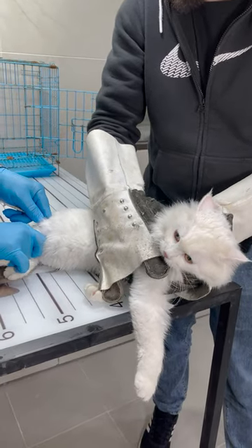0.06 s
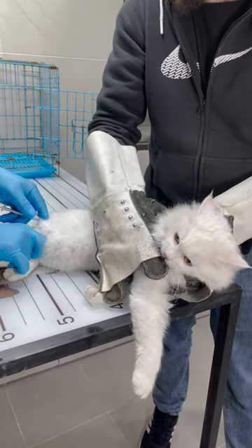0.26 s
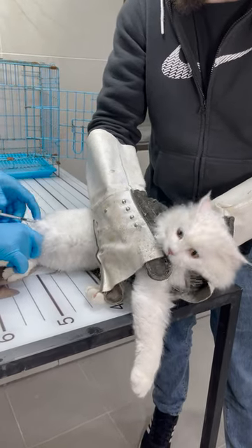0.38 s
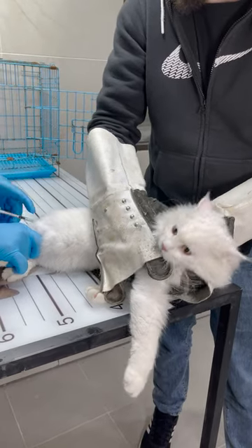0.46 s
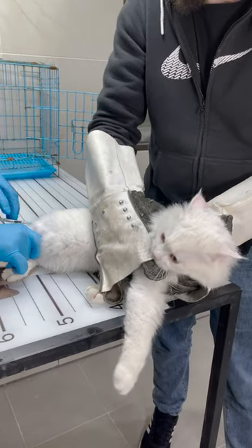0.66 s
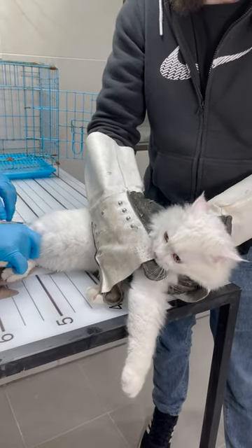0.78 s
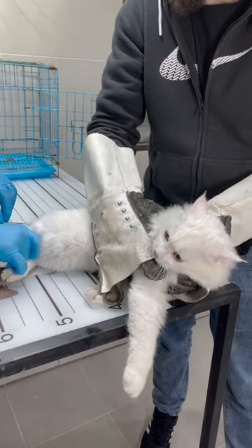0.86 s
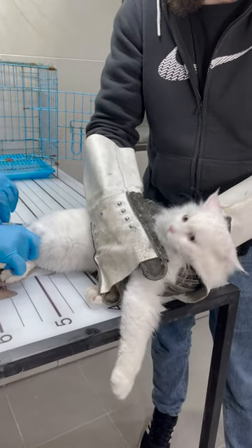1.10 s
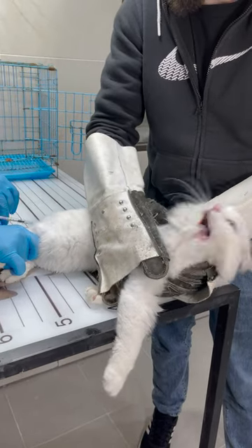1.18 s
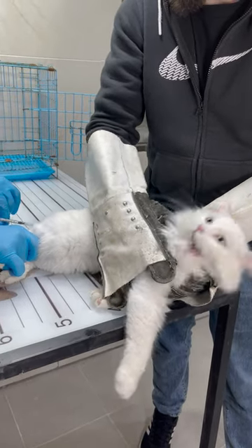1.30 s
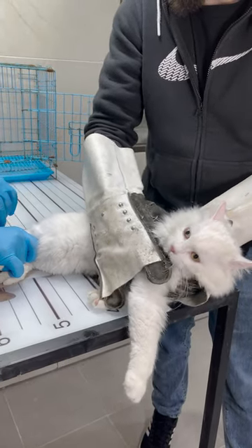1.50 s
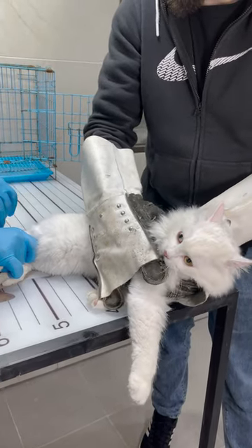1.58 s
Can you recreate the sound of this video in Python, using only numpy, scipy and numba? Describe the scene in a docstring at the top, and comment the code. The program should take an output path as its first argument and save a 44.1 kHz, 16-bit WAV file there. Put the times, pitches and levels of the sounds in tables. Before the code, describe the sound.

A cat's raspy growl builds to a harsh yowl, with a brief indoor echo.

```python
"""A cat on a table in a small tiled room first draws a hissing breath, ending in a soft mouth click.
From 0.17 s it growls: its vocal folds slap unevenly, often in strong-weak pairs, and the slaps ring
the throat and the opening mouth. Around 1 s the growl swells into a harsh yowl, which ends in a rattle
by 1.5 s; one low rasp follows. All along the room echoes briefly over faint air noise and mains hum,
and a phone about a metre away listens and widens the stereo sound."""
import sys
import numpy as np
from scipy import signal
from scipy.fft import rfft, irfft
from scipy.io import wavfile
from scipy.ndimage import uniform_filter1d
from numba import njit

SR = 44100
rng = np.random.default_rng(int(sys.argv[2]) if len(sys.argv) > 2 else 0)


def file_out(sig):
    """Save sig as 16-bit WAV at sys.argv[1]."""
    # one column per channel
    cols = np.atleast_2d(sig).T
    # limit, then scale
    lim = np.clip(cols, -1, 1)
    pcm = np.round(lim * 32767).astype(np.int16)
    wavfile.write(sys.argv[1], SR, pcm)


N = 72765

# How hard the cat cries; the mouth and chest sounds follow it: t/s, level/dB
EFFORT = [(.168, -50), (.202, -32), (.286, -18.5), (.334, -19), (.374, -17.5), (.51, -23), (.598, -20.5),
          (.696, -36), (.75, -24.5), (.775, -27), (.806, -37), (.89, -20), (.974, -15), (1.07, -15),
          (1.256, -19.5), (1.264, -22.5), (1.485, -24.5)]
def cat(start_s=0.17, stop_s=1.489, fade_s=0.0045):
    """The growl and yowl: slaps and puffs of air make the mouth, chest, throat and teeth gap ring."""
    t = np.arange(N) / SR
    slaps, air = vocal_folds()
    effort_db = curve(EFFORT)
    voice = (mouth(slaps + air, effort_db) + chest(slaps, effort_db) + throat(slaps + air / 2)
             + upper_mouth(slaps + air) + teeth(slaps + 2 * air))
    return voice * (t > start_s) * fade_after(stop_s, fade_s)


# The pitch, or how often the vocal folds slap: t/s, f/Hz
PITCH = [(.23, 483.5), (.28, 670.6), (.315, 739.5), (.332, 499.5), (.355, 510), (.39, 614.2), (.425, 623.3),
         (.46, 558), (.52, 485.3), (.545, 474), (.575, 587.3), (.6, 645.6), (.635, 592.6), (.7, 522.3),
         (.755, 555.8), (.815, 494.6), (.86, 555.4), (.9, 593.8), (.95, 615), (.995, 567.7), (1.075, 575.2),
         (1.135, 635.8), (1.265, 629), (1.28, 513.1), (1.345, 502.7), (1.405, 397.2), (1.465, 402.7),
         (1.5, 355.2)]
# How uneven the slaps are: t/s, roughness/0-1, weakening of every second slap/dB,
# lateness of that slap/cycles, flutter that repeats every five slaps/dB
UNEVENNESS = [ (.17, .8, 18, 0, 0), (.31, .35, 15, .1, 0), (.34, .33, 3, .13, 2), (.46, .34, 4, .15, 2),
              (.52, .11, 4, .14, 0), (.61, .25, 3, .16, 0), (.68, .42, 5, .12, 0), (.755, .27, 9, .08, 0),
              (.8, .45, 8, .1, 0), (.84, .12, 7, .1, 0), (.905, .05, 3, .02, 0), (.95, .12, 6, .1, 0),
              (1., .27, 2, .04, 4.5), (1.08, .3, 2, .04, 4.5), (1.14, .8, 0, 0, 2), (1.37, 1, 3, 0, 0),
              (1.41, .24, 14, 0, 0), (1.5, .38, 14, 0, 0)]
def vocal_folds(jitter_cycles=.11, scatter_db=4.2, flutter_cycles_per_db=.02, air_gain=.8):
    """The folds slap shut once a cycle, limping in pairs; a puff of air follows each slap."""
    cycles = np.cumsum(curve(PITCH)) / SR
    count = np.arange(1, int(cycles[-1]))
    due_s = np.interp(count, cycles, np.arange(N) / SR)
    rough, weak_db, late, flutter_db = (curve(UNEVENNESS, column, due_s) for column in range(1, 5))
    time_luck, size_luck = rng.standard_normal((len(count), 2)).T
    is_weak = count % 2
    flutter_angle = 2 * np.pi * count * 2 / 5
    shift_cycles = jitter_cycles * rough * time_luck + late * is_weak
    shift_cycles += flutter_cycles_per_db * flutter_db * np.sin(flutter_angle)
    slap_s = due_s + shift_cycles / curve(PITCH, at=due_s)
    random_db = scatter_db * np.sqrt(rough) * np.minimum(size_luck, 1.6)
    size = gain(random_db - weak_db * is_weak + flutter_db * np.cos(flutter_angle))
    # Each slap is spread over 16 samples, so it can land between two of them.
    samples = (slap_s * SR).astype(int)[:, None] + np.arange(-7, 9)
    offset = samples - slap_s[:, None] * SR
    slaps = np.zeros(N)
    np.add.at(slaps, np.clip(samples, 0, N - 1), size[:, None] * np.sinc(offset) * np.sinc(offset / 8))
    puff_shape = signal.lfilter([1], [1, -np.exp(-1 / (.0012 * SR))], slaps)  # fades over 1.2 ms
    puffs = puff_shape * rng.standard_normal(N)
    return steady(slaps), air_gain * curve(UNEVENNESS) * steady(puffs)


# Where the mouth rings: t/s, centre f/Hz, width/Hz
MOUTH_RING = [(.2, 2110, 1700), (.3, 2570, 1430), (.38, 2160, 1020), (.53, 3130, 2440), (.59, 2220, 1302),
              (.68, 1845, 427), (.76, 1920, 591.7), (.82, 1800, 485), (.89, 2006, 484), (.94, 1940, 696),
              (.99, 2360, 1060), (1.09, 2300, 1050), (1.135, 1915, 840), (1.2, 2000, 1400),
              (1.28, 1920, 855), (1.37, 2210, 676), (1.45, 2440, 1440)]
# The mouth's unchanging tone: f/Hz, level/dB
MOUTH_TONE = [(300, -33.5), (1000, -10), (1340, -3.5), (1540, 5), (1950, 0), (2700, 0.5), (3400, 0.5),
              (4500, -11), (6000, -14.5), (14000, -50.5)]
def mouth(source, effort_db, trim_db=-3):
    """The mouth rings higher and over a wider band as the jaw opens."""
    hz, width_hz = curve(MOUTH_RING), curve(MOUTH_RING, 2)
    ringing = ring(ring(source, hz, width_hz), hz, width_hz)
    return gain(effort_db + trim_db) * steady(colour(ringing, MOUTH_TONE))


# The chest's deep tone: f/Hz, level/dB
CHEST_TONE = [(100, -49), (185, -0.5), (250, -10), (345, 0), (450, 8.5), (1500, -99.5)]
# The chest's loudness, added to the effort: t/s, level/dB
CHEST_LEVEL = [(.18, -13), (.23, -18.5), (.3, -26.5), (.4, -32.5), (.55, -36), (.8, -40), (.92, -44),
               (1.02, -28), (1.2, -35.5), (1.38, -19), (1.48, -31.5)]
def chest(slaps, effort_db):
    """The slaps make the chest rumble."""
    return gain(effort_db + curve(CHEST_LEVEL)) * steady(colour(slaps, CHEST_TONE))


# The throat's tone: f/Hz, level/dB
THROAT_TONE = [(60, -40), (200, -22), (420, -12), (520, -4), (720, -3), (920, 3), (1060, -3), (1230, -3),
               (1500, -14), (2200, -34), (5000, -60)]
# The throat's loudness before the trim: t/s, level/dB
THROAT_LEVEL = [(0.17, -74.5), (0.202, -44.5), (0.36, -32), (0.714, -41.5), (0.758, -33.5), (0.784, -39.5),
                (1.08, -28.5), (1.088, -33), (1.204, -28), (1.432, -41.5), (1.485, -39)]
def throat(source, trim_db=-0.5):
    """The throat rings in one fixed band, about 500 to 1200 Hz."""
    return gain(curve(THROAT_LEVEL) + trim_db) * steady(colour(source, THROAT_TONE))


# Where the mouth's higher ring sits: t/s, f/Hz
UPPER_RING = [(.24, 2800), (.43, 3426), (.53, 3240), (.6, 3060), (.72, 4250), (1.45, 3880)]
# Its unchanging tone: f/Hz, level/dB
UPPER_TONE = [(1500, -18.5), (2700, -3), (4400, 7), (5000, 5.5), (14000, -43)]
# Its loudness before the trim: t/s, level/dB
UPPER_LEVEL = [(0.17, -100), (0.194, -61), (0.312, -26.5), (0.542, -23), (0.642, -51), (0.824, -57.5),
               (1.044, -28), (1.138, -37), (1.22, -32), (1.29, -47), (1.442, -25), (1.485, -34)]
def upper_mouth(source, trim_db=-2):
    """A second, higher ring of the mouth gives the cry its harsh edge."""
    hz, width_hz = curve(UPPER_RING), np.full(N, 750.)
    ringing = ring(ring(source, hz, width_hz), hz, width_hz)
    return gain(curve(UPPER_LEVEL) + trim_db) * steady(colour(ringing, UPPER_TONE))


# Where the gap between the teeth rings: t/s, f/Hz
TEETH_RING = [(.3, 5470), (.53, 6100), (.58, 4960), (1.12, 4660), (1.2, 6080), (1.28, 6000), (1.38, 7840),
              (1.43, 5630)]
# Its unchanging tone: f/Hz, level/dB
TEETH_TONE = [(1500, -45), (4000, -14), (5000, -1.5), (5700, 1), (6300, 1.5), (7200, 4), (8300, 3),
              (9700, -16), (10900, 3), (12200, -17), (14500, -64)]
# Its loudness before the boost: t/s, level/dB
TEETH_LEVEL = [(0.17, -83), (0.312, -51.5), (0.348, -50), (0.546, -38.5), (0.638, -65), (0.708, -59.5),
               (1.096, -49), (1.146, -34.5), (1.208, -31), (1.292, -46), (1.428, -46), (1.485, -45.5)]
def teeth(hiss, width_hz=540., ring_db=13.5, boost_db=6):
    """Breathy slaps ring the gap between the teeth, adding a bright sizzle."""
    ringing = hiss + gain(ring_db) * ring(hiss, curve(TEETH_RING), np.full(N, width_hz))
    return gain(curve(TEETH_LEVEL) + boost_db) * steady(colour(ringing, TEETH_TONE))


# The tone of a rasp: f/Hz, level/dB
RASP_TONE = [(30, -35), (100, -18), (170, -2), (450, -2), (900, -5), (2300, -3), (3500, -15), (7000, -19),
             (14000, -40)]
# One row for each rasp: start t/s, hold time/s, level/dB
RASPS = [(0.189, 0.057, -40.5), (1.629, .03, -42)]
def rasps(rise_s=0.0018, fade_s=0.1):
    """Low, throaty rasps as the folds start to move."""
    t = np.arange(N) / SR
    swell = sum(gain(db) * np.clip((t - start) / rise_s, 0, 1) * fade_after(start + hold, fade_s)
                for start, hold, db in RASPS)
    return swell * noise(RASP_TONE)


# The hiss of the breath in: f/Hz, level/dB
BREATH_TONE = [(200, -50), (900, -27), (1600, -15.5), (2000, -17), (2500, -8.5), (3000, -18.5), (3450, -30),
               (4300, -18), (4800, -14), (5450, -5.5), (6800, -15.5), (7800, -2.5), (9300, -23),
               (10500, -4.5), (11200, -15), (12300, -14), (14500, -36)]
# The click that ends it: f/Hz, level/dB
CLICK_TONE = [(300, -31), (1400, -9), (2200, 2), (3300, -11), (4300, 1), (6000, -1.5), (9000, -49)]
def breath_in(hiss_db=-46.5, stop_s=0.1, fade_s=0.0026, click_db=-45, click_at_s=.119):
    """The cat sucks air through its teeth and stops with a soft click of the mouth."""
    t = np.arange(N) / SR
    click = gain(click_db) * noise(CLICK_TONE) * np.exp(-((t - click_at_s) / 0.0061) ** 2)
    hiss = gain(hiss_db) * noise(BREATH_TONE) * fade_after(stop_s, fade_s)
    return click + hiss


def room(sound, low_fade_s=0.44, high_fade_s=0.36, echo_db=-4.5, spread=.5):
    """The tiles give a short echo, mostly alike left and right; it drops 60 dB in each fade time."""
    t = np.arange(N) / SR
    shared, apart = rng.standard_normal((2, N))
    apart = signal.sosfilt(signal.butter(2, 450, "high", fs=SR, output="sos"), apart)
    bounces = shared + spread * apart * np.array([[1], [-1]])
    lows = signal.sosfilt(signal.butter(2, 3500, fs=SR, output="sos"), bounces)
    echo = lows * gain(-60 * t / low_fade_s) + (bounces - lows) * gain(-60 * t / high_fade_s)
    echo *= np.clip((t - .003) / .004, 0, 1)  # the first bounce takes 3 ms
    echo /= np.sqrt(np.sum(echo ** 2) / 2)
    return sound + gain(echo_db) * signal.fftconvolve(sound[None], echo, axes=1)[:, :N]


def mains_hum(hz=100, level_db=-72, waver_db=4):
    """Mains electricity hums on one low note whose loudness wavers."""
    waver = noise([(1, 0), (6, 0), (14, -40), (100, -120)])
    return gain(level_db + waver_db * waver) * np.sqrt(2) * np.sin(2 * np.pi * hz * np.arange(N) / SR)


# The tone of the room's air: f/Hz, level/dB
AIR_TONE = [(25, -20), (55, -12), (85, 3.5), (130, -6.5), (400, -5.5), (1000, -17.5), (3000, -14),
            (8000, -29), (14000, -27)]
def room_air(level_db=-66):
    """The air in the room makes a faint, low rush."""
    return gain(level_db) * noise(AIR_TONE)


def gain(db):
    """Turn decibels into a number to multiply by."""
    return 10 ** (np.asarray(db) / 20)


def fade_after(stop_s, fade_s):
    """Stay at 1 until stop_s, then shrink to about a third every fade_s."""
    return np.exp(-np.maximum(np.arange(N) / SR - stop_s, 0) / fade_s)


def curve(table, column=1, at=None):
    """One column of a table, joined by straight lines in time."""
    rows = np.array(table, float)
    return np.interp(np.arange(N) / SR if at is None else at, rows[:, 0], rows[:, column])


def over_hz(points):
    """Join (f/Hz, value) points into a line across all frequencies."""
    rows = np.array(points, float)
    hz = np.maximum(np.arange(N + 1) * SR / (2 * N), 1)
    return np.interp(np.log(hz), np.log(rows[:, 0]), rows[:, 1])


def colour(sound, tone):
    """Turn frequencies up or down as a (f/Hz, level/dB) table says."""
    cepstrum = irfft(np.log(gain(over_hz(tone))))
    # Keeping one half makes the ringing come after each slap, never before it.
    cepstrum[1:N] *= 2
    cepstrum[N + 1:] = 0
    return irfft(rfft(sound, 2 * N) * np.exp(rfft(cepstrum)))[:N]


def steady(sound, window=900):
    """Hold the average strength near 1, leaving single slaps uneven."""
    power = uniform_filter1d(uniform_filter1d(sound ** 2, window), window)
    return sound / np.sqrt(np.abs(power) + 1e-12)


def noise(tone):
    """Noise with the given tone and an average strength (rms) of 1."""
    rush = colour(rng.standard_normal(N), tone)
    return rush / np.sqrt(np.mean(rush ** 2))


@njit
def ring(sound, hz, width_hz):
    """Ring like a hollow that changes shape: let one moving band of frequencies through."""
    ringing, band_state, low_state = np.empty(len(sound)), 0., 0.
    for i in range(len(sound)):
        tuning, damping = np.tan(np.pi * hz[i] / SR), width_hz[i] / hz[i]
        band = (band_state + tuning * (sound[i] - low_state)) / (1 + tuning * (tuning + damping))
        band_state = 2 * band - band_state
        low_state += 2 * tuning * band
        ringing[i] = damping * band
    return ringing


def scene():
    """The cat in the echoing room, over faint hum and air noise."""
    return mains_hum() + room(cat() + breath_in() + rasps()) + room_air()


# How far the stereo widening puts the left channel ahead of the right: f/Hz, phase lead/radians
LEFT_LEAD = [(20, 0), (350, 0), (780, .3), (1000, .1), (1210, -.45), (1600, 0), (2050, .2), (2700, .95),
             (3400, .7), (4150, .75), (4650, 1.8), (4900, 3.3), (5200, 5.1), (5750, 6.2), (6200, 6.4),
             (7300, 7.9), (8500, 9.05), (9400, 9.45), (10300, 10.3), (11400, 11.5), (12000, 12.57)]
# How much louder it makes the left than the right: f/Hz, level/dB
LEFT_LEVEL = [(300, 0), (550, 3.5), (720, 1.5), (1050, 5.5), (1300, 1.3), (2200, .7), (2550, 3.5),
              (3400, 0), (4500, 0), (4900, -2), (5500, 1), (6500, 0)]
def record(dry, top_hz=15000):
    """The phone's stereo widening shifts phase and loudness between left and right; the top is cut."""
    sides = np.array([[1], [-1]]) / 2
    widening = gain(sides * over_hz(LEFT_LEVEL)) * np.exp(1j * sides * over_hz(LEFT_LEAD))
    heard = irfft(rfft(dry, 2 * N) * widening)[:, :N]
    return signal.sosfilt(signal.ellip(8, .2, 70, top_hz, fs=SR, output="sos"), heard)


dry = scene()
out = record(dry)
file_out(out)
```